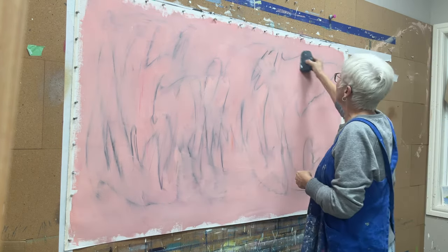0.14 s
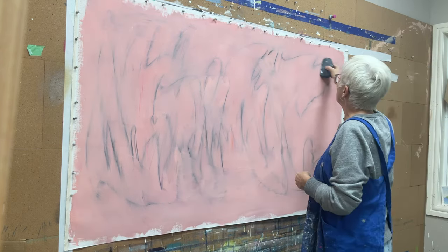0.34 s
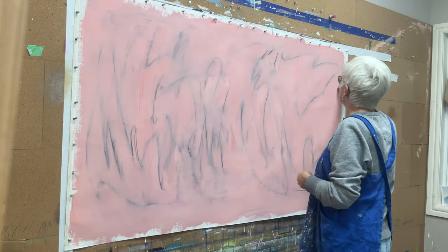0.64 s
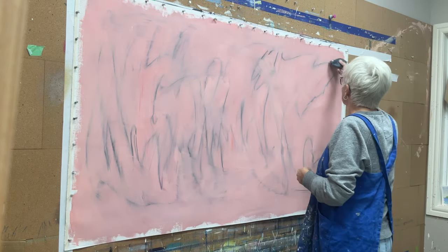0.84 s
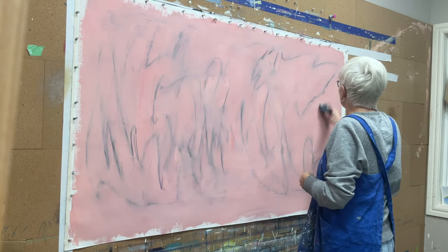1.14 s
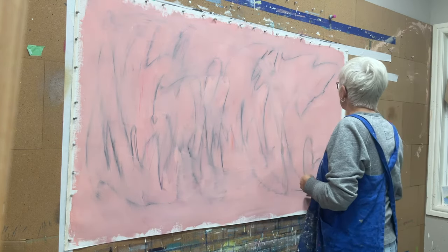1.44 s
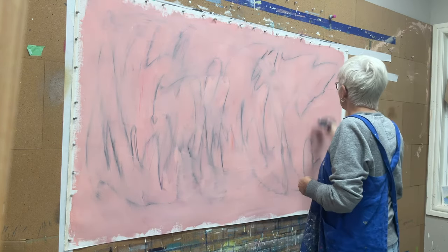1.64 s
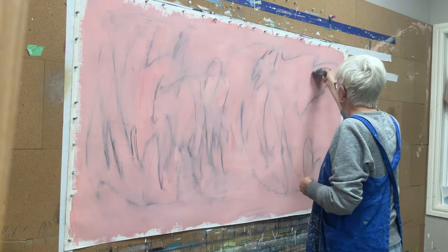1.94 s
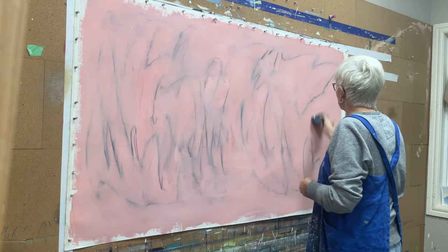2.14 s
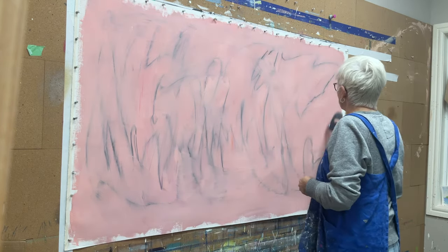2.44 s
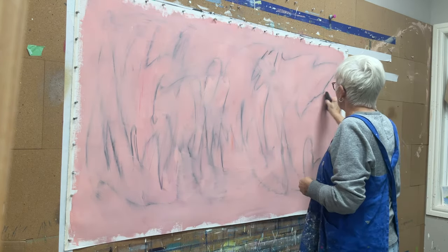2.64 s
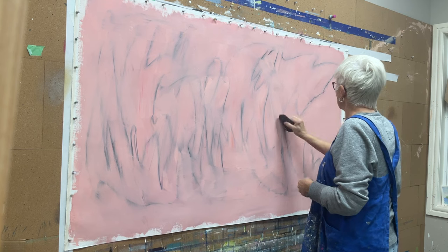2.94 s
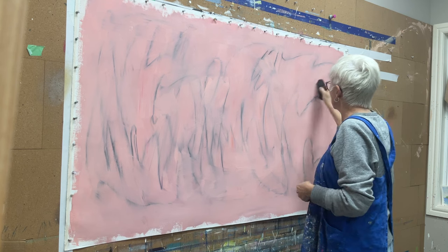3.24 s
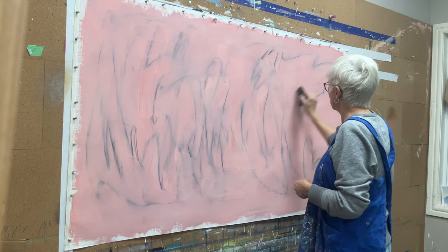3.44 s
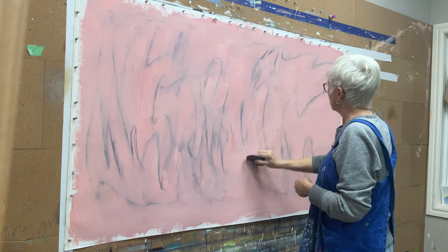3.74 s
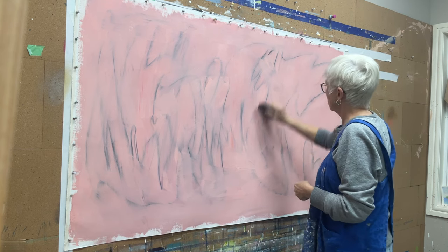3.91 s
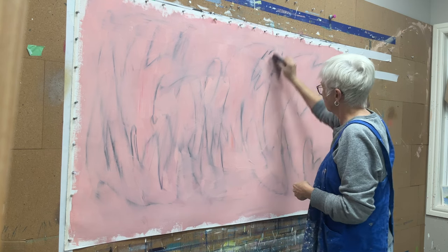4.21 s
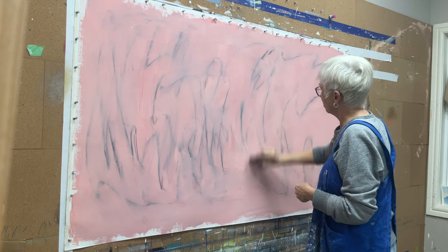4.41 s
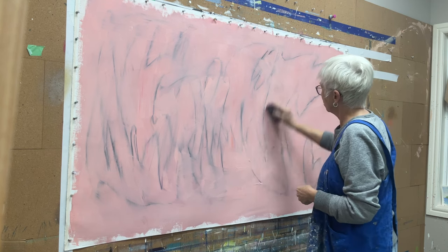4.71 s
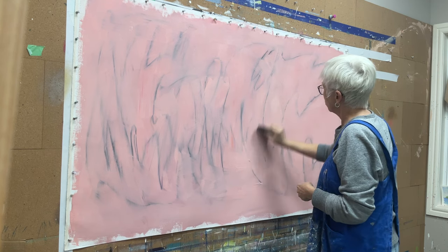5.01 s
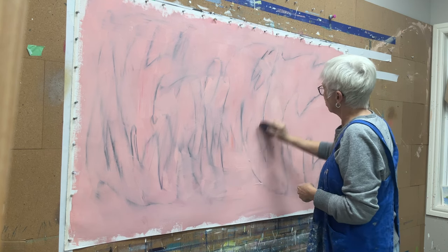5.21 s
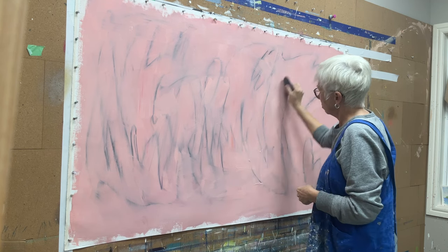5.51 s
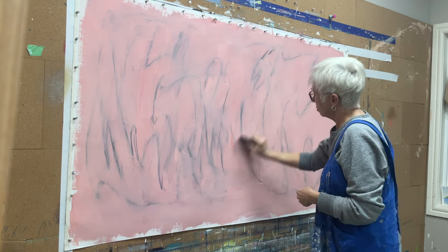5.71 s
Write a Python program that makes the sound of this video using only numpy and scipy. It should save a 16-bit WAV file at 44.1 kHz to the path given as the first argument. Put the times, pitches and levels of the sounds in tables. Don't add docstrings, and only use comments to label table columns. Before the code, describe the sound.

A quiet small studio with hard walls, faint room air, light hiss and a trace of hum, heard in mono from a few steps away. A wide brush is already moving over canvas on a wall board: a slow, low, soft scrape until about 0.65 s, then a pause. At 0.9 s it lands lightly and a stroke quickens, rising in pitch and loudness to a sharp short squeak at 1.33 s, ending by 1.46 s. At 1.98 s a firmer landing thumps the board, with a short dry scratch to 2.35 s, then a barely audible graze near 2.45 s. From 2.6 s the brush rubs to and fro until the end, loudest around 2.8 to 3.6 s, later gentler, each sweep a grainy fizzing swish dipping at the turns every third to half second. Brief chirps dot it, notably at 3.53, 4.45 and 5.33 s; a low judder shakes the board around 4.45 s.

```python
import sys
import numpy as np
from scipy import signal
from scipy.fft import rfft, irfft, next_fast_len
from scipy.io import wavfile
from scipy.ndimage import uniform_filter1d

SR = 44100
rng = np.random.default_rng(int(sys.argv[2]) if len(sys.argv) > 2 else 0)


def gain_from_db(level_db):
    decades = np.asarray(level_db, float) / 20
    return 10 ** decades


def transcribe(u):
    v = np.clip(np.atleast_2d(u).T, -1, 1)
    q = np.round(v * 32767).astype(np.int16)
    wavfile.write(sys.argv[1], SR, q)


N = 258415

# t/s, tick level/dB, thump level/dB
LANDINGS = [
    (0.909, -56, -74.5),
    (1.978, -51.5, -63),
    (2.627, -53.5, -70),
]
# turn t/s, effort at the turn/dB, effort at full speed/dB,
# lean over the sweep/dB, thread rate f/Hz
SWEEPS = [(2.612, -63, -48, 6, 2370), (2.831, -54, -43.5, -4, 2240), (3.0, -61, -50, 6, 2250),
          (3.32, -61, -45, 5.5, 2500), (3.808, -68.5, -51, 2, 2380), (4.165, -68, -51, 5.5, 2360),
          (4.556, -63, -55, -1, 2120), (4.899, -73, -49.5, 0.5, 1660), (5.13, -69.5, -55.5, 15.5, 2100),
          (5.485, -71.5, -51, 7.5, 2160), (5.9, -63.5, -55, 0.5, 1600)]
USUAL_DB = -55.5


def evened(x):
    return x / np.sqrt(np.mean(x ** 2) + 1e-20)


def read(points, hz):
    f, value = np.transpose(points)
    return np.interp(np.log(hz + 1), np.log(f + 1), value)


def add(mix, s, sound):
    part = mix[round(s * SR):][:len(sound)]
    part += sound[:len(part)]


def coloured(x, spectrum):
    size = next_fast_len(len(x))
    gain = gain_from_db(read(spectrum, np.fft.rfftfreq(size, 1 / SR)))
    return evened(irfft(rfft(x, size) * gain, size)[:len(x)])


def resonate(x, hz, width):
    turn = np.exp(2j * np.pi * np.cumsum(hz * np.ones(len(x))) / SR)
    r = np.exp(-np.pi * width / SR)
    return 2 * (turn * signal.lfilter([1 - r], [1, -r], x / turn)).real


def wander(count, seconds):
    size = max(int(seconds * SR), 1)
    smooth = uniform_filter1d(rng.standard_normal(count), size)
    return evened(uniform_filter1d(smooth, size))


def slips(per_s, spread_db, clump_db):
    size = gain_from_db(spread_db * np.minimum(rng.exponential(1, N), 4)) * rng.choice([-1., 1.], N)
    released = rng.random(N) < per_s / SR
    return evened(size * released * gain_from_db(clump_db * wander(N, 0.011)))


def hush():
    # f/Hz, level per Hz/dB
    hush_spectrum = [(24, -53), (40, -26), (91, -9), (103, -17.5), (123, -15), (143, -8.5), (193, -18.5),
                     (247, -8.5), (310, -18), (461, -13), (654, -24), (1220, -25.5), (1420, -24.5),
                     (15600, -31)]
    # f/Hz, rms level/dB
    hum_lines = [(119.5, -79), (240, -90)]
    t = np.arange(N) / SR
    waver_db = 2.5 * wander(N, .04)
    hum = sum(gain_from_db(db - 8.5 + waver_db) * np.sin(2 * np.pi * hz * t) for hz, db in hum_lines)
    air_db = -76.5 + 0.61 * wander(N, 0.029)
    return gain_from_db(air_db) * coloured(rng.standard_normal(N), hush_spectrum) + hum


def echoes():
    # f/Hz, t60/s
    decay_times = [(100, 0.07), (400, 0.3), (1200, .47), (3000, 0.35), (7000, 0.37), (14000, 0.1)]
    # delay t/s, level/dB
    wall_echoes = [(.0021, -2), (.0057, -1), (.0093, -18.5), (0.012, -22.5), (0.0194, -42)]
    taps = np.zeros(SR // 2 + SR // 8)
    at = np.arange(300, len(taps) - 20, 20)
    taps[at + rng.integers(0, 20, len(at))] = rng.choice([-1., 1.], len(at))
    hz, t, z = signal.stft(taps, SR, nperseg=256)
    t60 = read(decay_times, hz)[:, None]
    tail = signal.istft(z * gain_from_db(-60 * t / t60) / np.sqrt(t60), SR, nperseg=256)[1]
    tail *= gain_from_db(-4.5) / np.linalg.norm(tail)
    for delay, db in wall_echoes:
        tail[round(delay * rng.uniform(.8, 1.2) * SR)] += rng.choice([-1, 1]) * gain_from_db(db - 9)
    return tail


def studio(x):
    paths = np.array([wander(N, .025) for _ in range(5)])
    paths /= np.linalg.norm(paths, axis=0)
    return gain_from_db(-2.5) * x + sum(signal.fftconvolve(x * path, echoes())[:N] for path in paths)


def rubbing():
    rise_db_per_s, fall_db_per_s, turn_speed = 255, 160, 0.74
    rows = []
    for (s, turn_db, db, lean_db, hz), (end, next_db, *_) in zip(SWEEPS, SWEEPS[1:]):
        first_db, last_db = db - lean_db / 2, db + lean_db / 2
        rise = np.clip((first_db - turn_db) / rise_db_per_s, .01, .45 * (end - s))
        fall = np.clip((last_db - next_db) / fall_db_per_s, .01, .45 * (end - s))
        rows += [(s, turn_db, turn_speed * hz), (s + rise, first_db, hz), (end - fall, last_db, hz)]
    return rows + [(end, next_db, turn_speed * hz)]


def hand():
    # t/s, effort as fizz level/dB, thread rate f/Hz
    dabs = [
        [(0.0, -59.5, 480), (0.2, -60, 560), (0.35, -62, 930), (0.44, -58, 1030), (0.51, -58, 933),
         (0.54, -54, 1100), (0.6, -57, 1080), (0.67, -72, 1240)],
        [(0.91, -80, 888), (0.96, -72, 900), (1.06, -62.5, 952), (1.12, -55, 1540), (1.2, -50.5, 2140),
         (1.29, -54.5, 2220), (1.33, -49, 2310), (1.424, -45, 1940), (1.46, -59, 2100)],
        [(1.978, -52, 2160), (2.01, -58, 1680), (2.09, -53, 1740), (2.14, -56.5, 1710), (2.18, -53.5, 2000),
         (2.3, -59.5, 1900), (2.36, -87, 1340)],
        [(2.42, -88, 1500), (2.455, -79, 1570), (2.5, -80, 2600), (2.54, -115, 2250)],
    ]
    # t/s, change of effort/dB, width t/s
    surges = [(2.88, 2, 0.069), (3.21, 3.5, 0.068), (3.42, 3, 0.027), (3.569, 5, 0.0083), (3.65, -3, 0.036),
              (3.75, -3.5, 0.016), (3.86, 3.5, 0.059), (4.34, 4, 0.053), (4.44, 3, 0.022),
              (4.72, 2.5, 0.042), (4.935, 12.5, 0.025), (5.33, 0, 0.013), (5.8, -2, 0.045)]
    # weave band/dB, paint drag/dB, top sheen/dB, board shake/dB
    loads = [(-1.5, -2, 3.5, -69), (6, -2.5, 1, -67), (1.5, 2, 3.5, -58), (-10, -35, -17, -85.5),
             (-18, -1, 5, -64), (-20, 0.5, 3, -59.5), (-0.5, 0.5, 3, -59), (-3, -1, 3.5, -61),
             (6.5, -3.5, 3, -58), (-4, -0.5, 2, -67), (3.5, -1.5, 2, -59), (-9, 0, 3, -62),
             (1.5, -0.5, 2, -58), (0, 2, 3, -61.5), (2, 0, 1, -58)]
    t, strokes = np.arange(N) / SR, dabs + [rubbing()]
    s, db, hz = np.transpose(sum(strokes, []))
    effort_db = np.interp(t, s, db)
    for at, up_db, width in surges:
        effort_db += up_db * np.exp(-.5 * ((t - at) / width) ** 2)
    touch = np.zeros(N)
    for rows in strokes:
        start, end = rows[0][0], rows[-1][0]
        landing = (t - start) / .006 + (start < .02)
        lift = (end - t) / .03
        touch += np.clip(np.minimum(landing, lift), 0, 1)
    starts = [rows[0][0] for rows in dabs] + [row[0] for row in SWEEPS]
    stroke = np.maximum(np.searchsorted(starts, t + .02) - 1, 0)
    load = uniform_filter1d(np.array(loads, float)[stroke], size=1300, axis=0).T
    return effort_db, np.interp(t, s, hz), touch, load


def pressure():
    # t/s, shake level/dB, rise t/s, fall t/s
    presses = [(0.04, -61.5, .03, 0.7), (0.945, -46, 0.025, 0.1), (1.33, -58, 0.051, .05),
               (2.011, -41, 0.03, 0.053), (2.67, -51, 0.051, .07), (3.7, -46, 0.16, 0.11),
               (4.07, -58, 0.16, 0.045), (4.44, -42.5, 0.17, 0.17), (5.1, -47.5, 0.081, .08),
               (5.37, -53, 0.035, 0.14), (5.72, -46.5, 0.077, 0.28)]
    effort_db, _, touch, load = hand()
    t = np.arange(N) / SR
    pushes = sum(gain_from_db(db - 20 * np.maximum((s - t) / rise, (t - s) / fall)) for s, db, rise, fall in presses)
    shake_lag = 0.69
    steady = gain_from_db(load[3] + (1 - shake_lag) * (effort_db - USUAL_DB))
    return touch * (steady + pushes)


def board():
    # f/Hz, bandwidth f/Hz, level/dB
    modes = [(59, 33, -25), (109.4, 5.3, -1.5), (144.3, 11.3, 1.5), (172.2, 9.2, 1), (209, 83, 4),
             (263, 28, -2.5)]

    def ring(x):
        return sum(gain_from_db(db) * resonate(x, hz, width) / np.sqrt(width) for hz, width, db in modes)

    push = pressure() * gain_from_db(-4) * slips(per_s=4000, spread_db=1.5, clump_db=1)
    unit = np.std(ring(rng.standard_normal(SR)))
    for s, _, thump_db in LANDINGS:
        add(push, s + 0.0074, gain_from_db(thump_db + 15.5) * np.hanning(30))
    low_band = signal.butter(3, [68, 420], "band", fs=SR, output="sos")
    return signal.sosfilt(low_band, ring(push) / unit)


def raggedness(db, length):
    tight_db, tight_ragged, ragged_per_db, most, steady_s = -30, .12, .05, .7, .06
    return np.clip(tight_ragged + ragged_per_db * (tight_db - db), 0, most) * min(1, steady_s / length)


def squeak(db, first_hz, last_hz, length):
    ragged = raggedness(db, length)
    jitter, flutter = wander(count=8000, seconds=.0012), wander(count=8000, seconds=.003)
    size = min(int(length * SR), 8000)
    hz = np.linspace(first_hz, last_hz, size) * (1 + 0.099 * ragged * jitter[:size])
    turns = 2 * np.pi * np.cumsum(hz) / SR
    tone = np.sin(turns) + gain_from_db(-21) * np.sin(2 * turns)
    tone = evened(gain_from_db(6 * ragged * np.tanh(flutter[:size])) * tone) / np.sqrt(2)
    return gain_from_db(db) * tone * signal.windows.tukey(size, .35)


def judders():
    # t/s, level/dB, first f/Hz, last f/Hz, length t/s
    judder_events = [
        (2.655, -51.5, 137, 134, 0.043),
        (3.62, -61.5, 135.6, 143, 0.19),
        (3.7, -60, 515.5, 492, 0.16),
        (4.05, -64, 471, 450, 0.13),
        (4.432, -43, 133.7, 141, 0.15),
    ]
    out = np.zeros(N)
    for s, *shape in judder_events:
        add(out, s, squeak(*shape))
    return out


def squeaks():
    # t/s, level/dB, first f/Hz, last f/Hz, length t/s
    squeak_events = [(1.1, -56, 1880, 2300, .11), (1.195, -49.5, 2280, 2620, .14),
                     (1.329, -27, 2570, 2510, .019), (1.365, -42, 2510, 2520, .034),
                     (1.386, -44, 2150, 2180, .05), (1.396, -48, 1600, 1350, .05),
                     (2.18, -54, 1910, 1900, .08), (2.876, -45, 2300, 1650, .035),
                     (2.902, -41, 1700, 1330, .055), (3.534, -36, 2450, 2400, .06),
                     (3.595, -44, 2420, 2400, .05), (4.32, -50, 4750, 4600, .11),
                     (4.425, -46, 3700, 3300, .025), (4.444, -38, 3000, 2750, .025),
                     (4.456, -42, 2460, 2400, .04), (4.475, -42, 2850, 2800, .05),
                     (4.753, -42, 2050, 1700, .018), (4.925, -41, 1285, 1240, .024),
                     (5.306, -40, 2220, 2160, .02), (5.334, -31, 2120, 2050, .016),
                     (5.351, -41, 1980, 2060, .045), (5.4, -51, 2080, 2080, .07), (5.5, -59, 800, 780, .05),
                     (5.598, -39, 2130, 2190, .022)]
    out = np.zeros(N)
    for s, *shape in squeak_events:
        add(out, s, squeak(*shape))
    return out


def landings():
    out, t = np.zeros(N), np.arange(2500) / SR
    for s, tick_db, _ in LANDINGS:
        envelope = gain_from_db(tick_db - 60 * t / .12) * np.minimum(t / .004, 1)
        add(out, s, envelope * rng.standard_normal(2500))
    band = signal.butter(6, [450, 5800], "band", fs=SR, output="sos")
    return signal.sosfilt(band, out + 2.4 * resonate(out, 1430, 2700))


def bristles():
    # f/Hz, level per Hz/dB
    fizz_spectrum = [(410, -37), (700, -14), (956, -8.5), (1050, -4.5), (1370, -3), (1540, -4),
                     (1740, -2.5), (2370, 0), (2990, 1.5), (3930, -1), (4840, 1.5), (6780, -6),
                     (12200, -15), (15600, -20.5)]
    # f/Hz, level per Hz/dB
    drag_spectrum = [(200, -30), (330, -5.5), (600, 0), (1000, -2), (1600, -1.5), (3000, -29)]
    fizz_db, thread_hz, touch, (weave_db, drag_db, sheen_db, _) = hand()
    over_db = fizz_db - USUAL_DB
    weave_db = weave_db - 0.1 * over_db
    drag_db = drag_db - 0.69 * over_db
    sheen_db = sheen_db - .15 * over_db
    fizz = coloured(slips(per_s=16000, spread_db=1.5, clump_db=.7), fizz_spectrum)
    sheen = signal.sosfilt(signal.butter(3, 6200, "high", fs=SR, output="sos"), fizz)
    fizz = fizz + gain_from_db(sheen_db) * sheen - sheen
    rub = slips(per_s=9000, spread_db=0.0, clump_db=3.9)
    narrow, wide = rub, rub
    for _ in range(3):
        narrow = resonate(narrow, thread_hz, 800)
        wide = resonate(wide, thread_hz, 2200)
    fast = np.clip((thread_hz - 1000) / 1100, 0, 1)
    weave = (1 - fast) * evened(narrow) + fast * evened(wide)
    weave = signal.sosfilt(signal.butter(4, 5600, fs=SR, output="sos"), weave)
    drag = coloured(slips(per_s=4000, spread_db=-1, clump_db=2.1), drag_spectrum)
    return touch * gain_from_db(fizz_db) * (gain_from_db(2.0) * fizz + gain_from_db(weave_db - 3) * weave + gain_from_db(drag_db - 2.5) * drag)


def scene():
    brush = bristles() + landings()
    wall = board() + judders()
    locks = squeaks()
    share = gain_from_db(-3.5)
    mono = studio(brush + share * locks) + (1 - share) * locks + wall + hush()
    return np.tile(mono, (2, 1))


def low_pass(x):
    return signal.sosfilt(signal.butter(12, 15710, fs=SR, output="sos"), x)


def record(dry):
    cut = signal.sosfilt(signal.butter(4, 46, "high", fs=SR, output="sos"), dry)
    edge = signal.firwin(511, 15750, window=("kaiser", 9), fs=SR)
    return low_pass(signal.oaconvolve(cut, edge[None], "same"))


dry = scene()
out = record(dry)
transcribe(out)
```